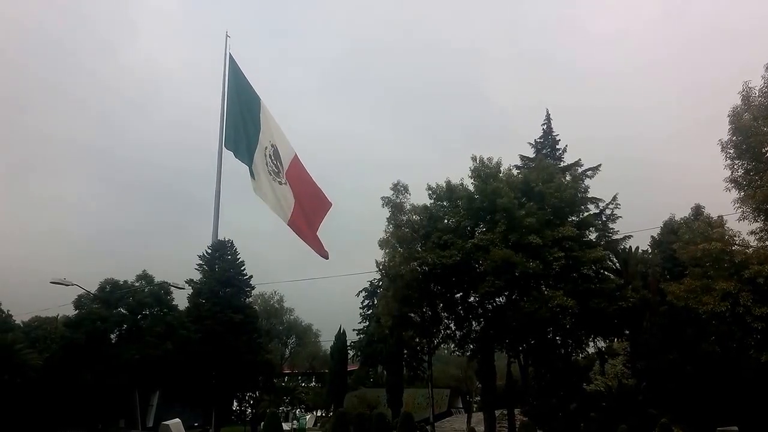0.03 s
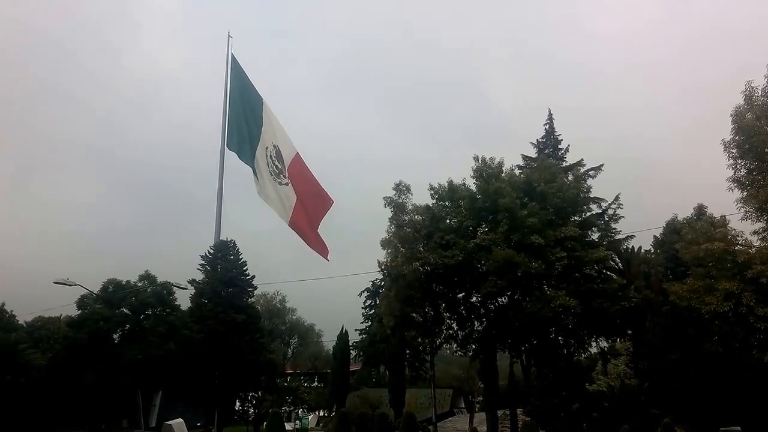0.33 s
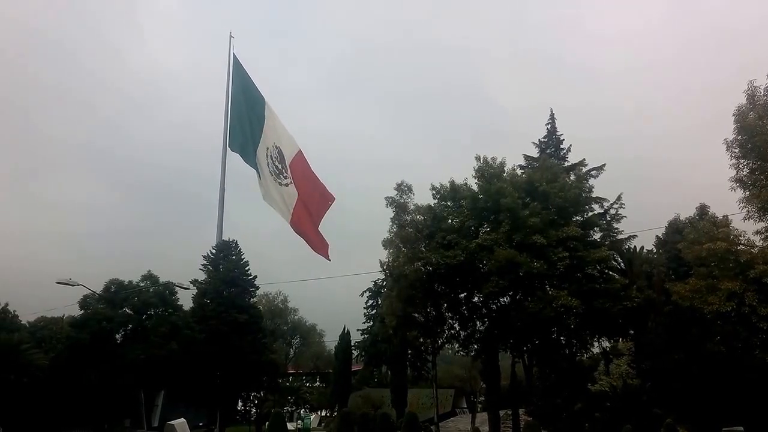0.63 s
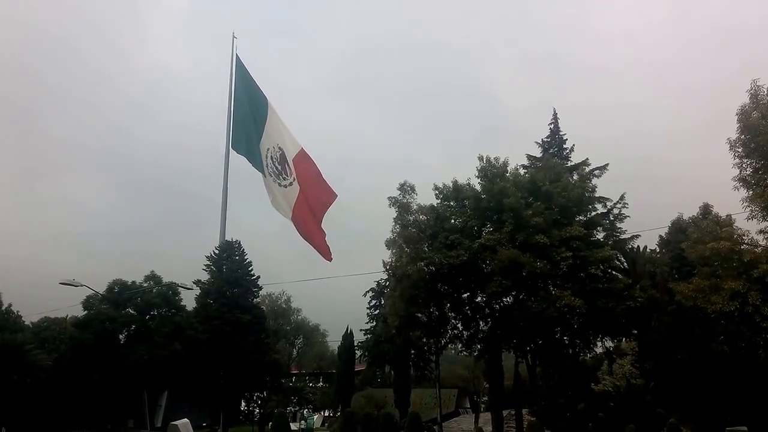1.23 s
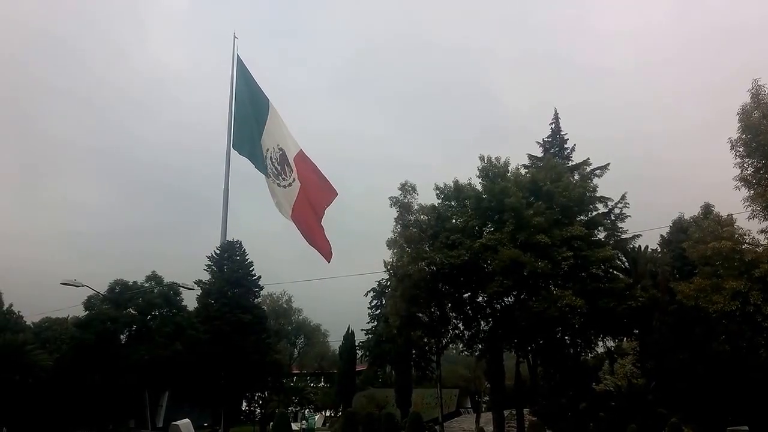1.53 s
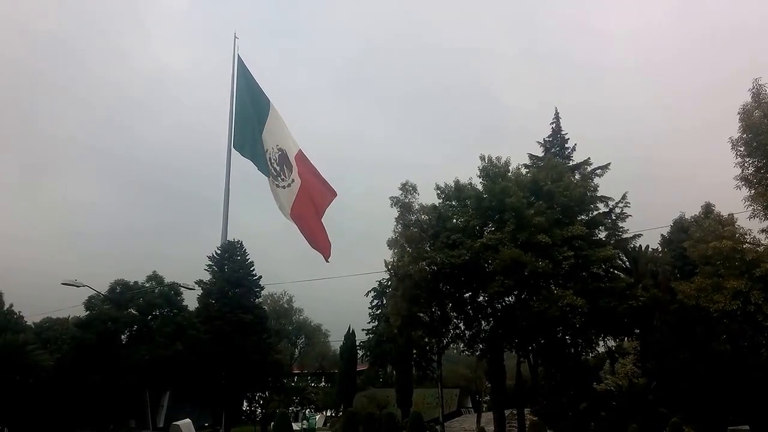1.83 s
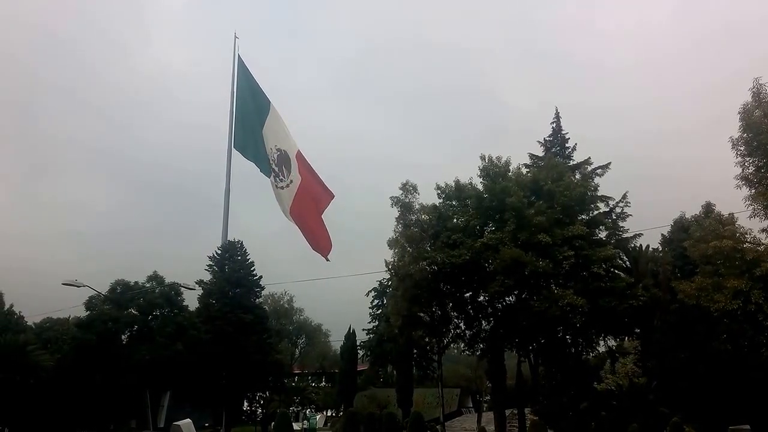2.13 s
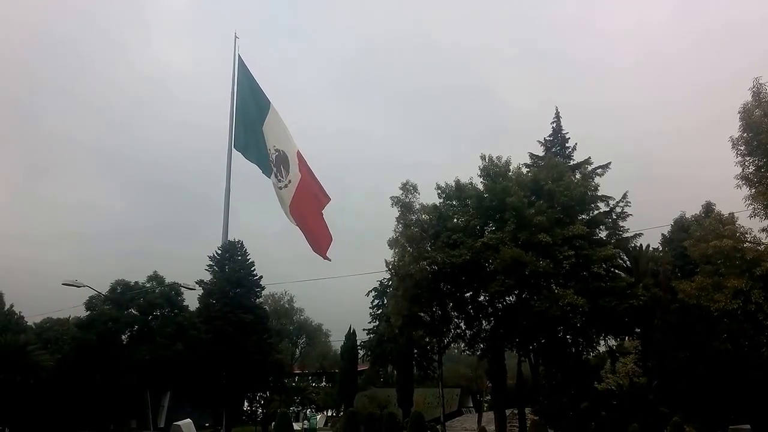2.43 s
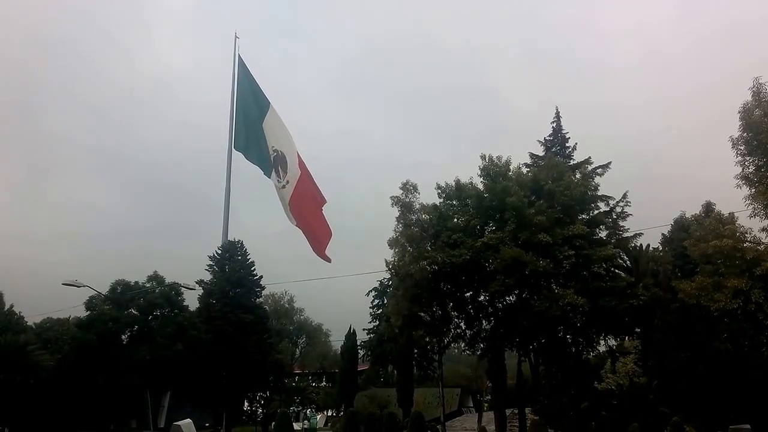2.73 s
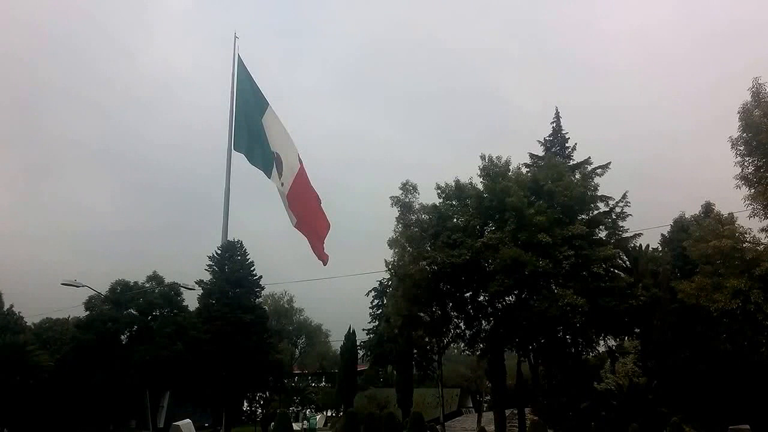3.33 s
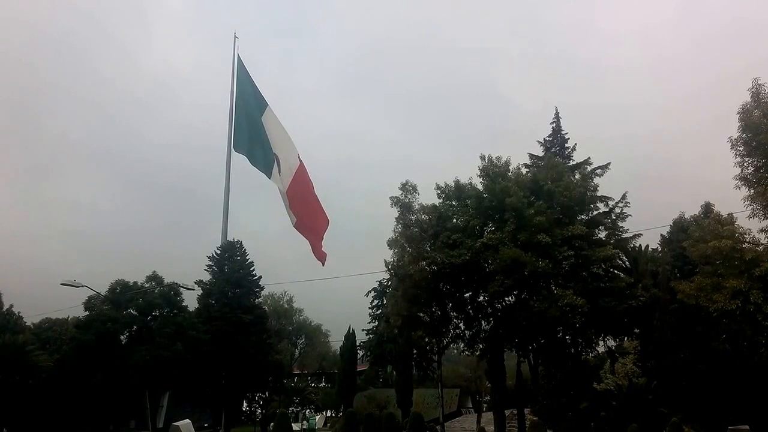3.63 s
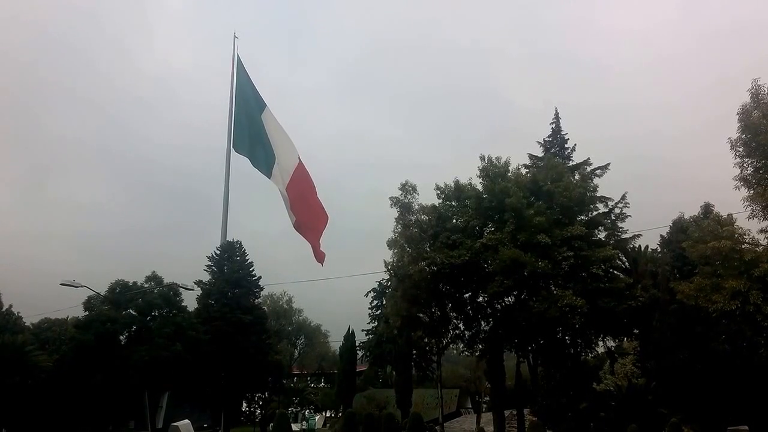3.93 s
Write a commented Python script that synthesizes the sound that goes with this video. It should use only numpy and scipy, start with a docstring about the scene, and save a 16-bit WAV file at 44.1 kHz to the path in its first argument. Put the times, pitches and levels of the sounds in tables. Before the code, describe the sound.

Distant traffic rumbles throughout, easing and swelling as truck and bus engines drone far away. Around a stereo microphone in a city park, air and foliage hiss softly and small birds chirp faintly now and then.

```python
"""Distant traffic, heard from a city park under an open sky through a stereo microphone.
The far vehicles merge into a rumble that eases and swells again; three engines drone out of it,
smeared by the streets. Around the microphone, air and foliage hiss evenly and wide, and small birds
chirp faintly in the trees: a few nearby, a flock farther off."""
import sys
import numpy as np
from scipy import signal
from scipy.fft import rfft, irfft
from scipy.io import wavfile
from scipy.ndimage import uniform_filter1d

SR = 44100
rng = np.random.default_rng(int(sys.argv[2]) if len(sys.argv) > 2 else 0)


def digitize_waveform(pressure):
    """Quantize a signal to 16-bit integers and store it at the path in sys.argv[1].

    Rows of a 2-D input are taken as channels; values are limited to [-1, 1].
    """
    field = np.atleast_2d(pressure).T
    bounded = np.clip(field, -1, 1)
    quanta = np.round(bounded * 32767).astype(np.int16)
    wavfile.write(sys.argv[1], SR, quanta)


N = 176400


def undb(db):
    return 10 ** (np.asarray(db) / 20)


def unit_rms(x):
    return x / np.sqrt(np.mean(x ** 2))


def stereo(mid, side):
    return np.array([mid + side, mid - side])


def curve(rows, column):
    """One column of a time table, sample by sample."""
    rows = np.array(rows)
    return np.interp(np.arange(N) / SR, rows[:, 0], rows[:, column])


def wander(rate_hz):
    """Random steps, smoothed twice, with an RMS of 1."""
    hold = max(int(SR / rate_hz), 2)
    steps = np.repeat(rng.standard_normal(N // hold + 1), hold)
    return unit_rms(uniform_filter1d(uniform_filter1d(steps, hold), hold)[:N])


def noise(spectrum):
    """Noise of a given colour, falling steeply beyond its ends, with an RMS of 1."""
    hz, db = np.array(spectrum).T
    f = np.maximum(np.arange(N // 2 + 1) * SR / N, 1)
    skirts = np.minimum(f / hz[0], 1) ** 4 * np.minimum(hz[-1] / f, 1) ** 4
    colour = undb(np.interp(np.log(f), np.log(hz), db))
    return unit_rms(irfft(rfft(rng.standard_normal(N)) * skirts * colour, N))


def echoes(x, t60_s):
    """Dense scattered reflections that die away."""
    t = np.arange(SR) / SR
    tail = rng.standard_normal(SR) * np.exp(-np.log(1000) * t / t60_s)
    return signal.fftconvolve(x, tail / np.linalg.norm(tail))[:N]


# Colour of the hiss around the microphone, mid and side: frequency_hz, relative_db
AIR_MID = [(410, -29), (700, -6), (885, -5), (1070, -3), (1180, -4.5), (1380, -8), (1800, -4.5), (2100, -7),
           (2280, -4.5), (2500, -7), (2970, -6), (3300, -3), (3910, -7.5), (5150, -7.5), (6240, -12.5),
           (7130, -18), (7970, -28), (10400, -58.5), (17500, -120)]
AIR_SIDE = [(290, -34), (500, -1), (638, -17), (708, -2.5), (882, -2.5), (1130, -4), (1750, -4),
            (2390, -4.5), (3300, -5.5), (4360, 2.5), (6860, -2.5), (7610, -3), (7970, -17.5), (10400, -46),
            (17500, -120)]

def air(mid_db=-45.5, side_db=-48, roar_share=0.25):
    """Far tyres and foliage hiss smoothly on all sides, following a little of the traffic's roar."""
    swell = undb(roar_share * curve(TRAFFIC_FLOW, column=2) + 0.24 * wander(8.3))
    return swell * stereo(undb(mid_db) * noise(AIR_MID), undb(side_db) * noise(AIR_SIDE))


def tree_scatter(song, wet_db=-1.5):
    """The trees scatter birdsong, sending each channel its own reflections."""
    return undb(wet_db) * np.array([echoes(song, t60_s=0.62) for _ in range(2)])


def chirps(calls, flutter_db=2.5):
    """Each bird call is a short gliding whistle whose pitch rasps and whose strength flutters."""
    t, song = np.arange(N) / SR, np.zeros(N)
    waver = wander(900)
    for start_s, length_s, first_hz, last_hz, level_db, rasp in calls:
        on = (t > start_s) & (t < start_s + length_s)
        progress = (t[on] - start_s) / length_s
        pitch_hz = (first_hz + (last_hz - first_hz) * progress) * (1 + rasp * waver[on])
        arch = 2 * np.sqrt(progress * (1 - progress))
        song[on] += undb(level_db) * arch * np.sin(2 * np.pi * np.cumsum(pitch_hz) / SR)
    return song * undb(flutter_db * wander(170))


def far_flock(count, length_s=0.025, centre_hz=3550, spread_hz=220, fall_hz=150, level_db=-59, rasp=0.025):
    """Birds farther off twitter at random, half lost in the foliage."""
    when, pitch = rng.random((count, 2)).T
    starts_s = when * N / SR
    pitches_hz = centre_hz + spread_hz * (2 * pitch - 1)
    song = chirps([(start_s, length_s, hz, hz - fall_hz, level_db, rasp)
                   for start_s, hz in zip(starts_s, pitches_hz)])
    return song + tree_scatter(song)


# Calls from the nearby trees: start_s, length_s, first_pitch_hz, last_pitch_hz, level_db, rasp_ratio
BIRD_CALLS = [(.172, 0.072, 3660, 3720, -49.5, .03), (.303, 0.021, 3900, 3600, -47, .02),
              (.43, .19, 3780, 3730, -52.5, .04), (.612, .03, 3480, 3650, -48.5, 0.026),
              (.651, 0.019, 3680, 3920, -46.5, .02), (.676, .044, 3720, 3630, -44.5, .02),
              (.832, 0.022, 3770, 3560, -45.5, .025), (.85, .05, 3620, 3680, -51, 0.023),
              (1.818, 0.071, 3570, 3610, -49.5, .018), (1.887, 0.058, 3595, 3700, -45.5, 0.026),
              (1.941, .03, 3768, 3640, -41.5, 0.022), (1.858, .11, 6850, 6830, -51, 0.038),
              (1.88, .09, 7100, 7100, -60, 0.017), (2.13, .15, 7240, 7050, -58, .012)]

def near_birds(lag_s=0.00006):
    """Birds a little to the left: their calls reach the right microphone port slightly later."""
    t, left = np.arange(N) / SR, chirps(BIRD_CALLS)
    right = np.interp(t - lag_s, t, left)
    return np.array([left, right]) + tree_scatter(left)


def engine(track, harmonics, flutter_db, waver_ratio=0.022, street_db=-8):
    """Low harmonics of an uneven firing rate, arriving directly and off the house fronts."""
    firing_hz = curve(track, column=1) * (1 + waver_ratio * wander(14))
    phase = 2 * np.pi * np.cumsum(firing_hz) / SR
    lowest, *upper = [undb(db + flutter_db * wander(9)) * np.sin(k * phase + 2 * np.pi * rng.random())
                      for k, db in harmonics]
    upper_lift = undb(curve(track, column=3))  # brighter under load
    tone = (lowest + sum(upper) * upper_lift) / np.std(lowest + sum(upper))
    direct = tone * undb(curve(track, column=2))
    reflected = np.std(direct) * unit_rms(echoes(direct, t60_s=0.8))
    return direct + undb(street_db) * reflected


# Engines in the streets beyond the park: time_s, firing_hz, level_db, upper_lift_db
TRUCK_TRACK = [(0, 70.5, -25, -3), (.28, 71, -28, -1), (.5, 71.3, -21, -4), (.68, 72, -26, -1),
               (1.03, 71, -26, -1), (1.25, 70, -34, 0), (2.3, 68.5, -31, 0), (2.75, 68, -27, 0),
               (3.05, 67.5, -31, 0), (3.4, 67, -26, -2), (3.65, 67.5, -27, 0), (3.92, 68, -21, -5),
               (4, 68, -22, -5)]
DIESEL_TRACK = [(0, 50.8, -26.5, -9.5), (.4, 51.13, -37, 1), (.6, 51.21, -35, 10.5),
                (.78, 51.53, -39.5, 3.5), (1.1, 50.95, -33, -3), (1.45, 50.87, -36, -3.5),
                (1.9, 51.21, -32.5, -3.5), (2.55, 51.6, -38, 7), (3.1, 51.24, -39, 3), (4, 51.06, -40, 3)]
BUS_TRACK = [(0, 116.9, -27, -10.5), (.5, 116, -35, -6), (1.3, 112.1, -33.5, -11), (1.6, 107.8, -46.5, 2),
             (2.3, 99.6, -40, -1.5), (2.5, 101.2, -24.5, 1), (2.68, 103.4, -23.5, -5.5),
             (2.78, 109.1, -22, -8), (2.92, 110.6, -14, -7), (3.03, 112.3, -30, 9),
             (3.2, 113.6, -29.5, 7.5), (3.4, 113.4, -29, 7.5), (3.64, 111.5, -24.5, -6),
             (3.76, 112, -37.5, 0.5), (4, 112.3, -41.5, -4)]
# Their harmonics: firing_multiple, relative_db
TRUCK_HARMONICS = [(1, 1), (2, -20.5), (3, -21)]
DIESEL_HARMONICS = [(3, 2), (4, -4.5), (6, -13)]
BUS_HARMONICS = [(1, -0.5), (2, -15), (3, -30)]

def street_engines():
    """Far off and centred, a truck runs steadily, a diesel turns at low revs and a bus pulls away."""
    truck = engine(TRUCK_TRACK, TRUCK_HARMONICS, flutter_db=2.0)
    diesel = engine(DIESEL_TRACK, DIESEL_HARMONICS, flutter_db=2.5)
    bus = engine(BUS_TRACK, BUS_HARMONICS, flutter_db=2.5)
    return truck + diesel + bus


# Colour of the traffic as it reaches the park, mid and side: frequency_hz, relative_db
TRAFFIC_MID = [(24, -34), (40, -19), (52, -9.5), (62, -1.5), (75, -0.5), (90, 3), (112, -4.5), (135, -7),
               (182, -8), (215, -16.5), (250, -17), (310, -20.5), (400, -26.5), (445, -26.5), (520, -33),
               (650, -34.5), (1000, -47.5)]
TRAFFIC_SIDE = [(24, -40.5), (40, -13), (62, 0), (102, -3.5), (216, -5.5), (275, -10), (600, -19),
                (780, -51), (1320, -120)]
# Ebb and swell on the far roads: time_s, rumble_gain_db, roar_gain_db
TRAFFIC_FLOW = [(0, 2, -1), (.6, -3, 1), (1.1, 1.5, -0.5), (1.55, -2, -3.1), (2.15, -2.5, -2.6),
                (2.5, 2.5, -0.5), (2.85, -2.5, 1), (3.15, -1, 1.1), (3.6, 2.5, 0.5), (4, -5.5, -0.9)]

def traffic(mid_db=-22, side_db=-50.5, crossover_hz=137, lumps_db=1.5):
    """Many far vehicles merge into a lumpy, deep rumble and a higher roar, each swelling with the flow."""
    vehicles = noise(TRAFFIC_MID)
    lows = signal.sosfiltfilt(signal.butter(2, crossover_hz, fs=SR, output="sos"), vehicles)
    roar = (vehicles - lows) * undb(curve(TRAFFIC_FLOW, column=2) + 1.3 * wander(7.03))
    rumble = lows * undb(curve(TRAFFIC_FLOW, column=1) + lumps_db * wander(18))
    return stereo(undb(mid_db) * (rumble + roar), undb(side_db) * noise(TRAFFIC_SIDE))


def scene():
    """From a spot in the park: engines and traffic far off, air and birds all around."""
    return street_engines() + traffic() + air() + near_birds() + far_flock(count=36)


# Balance of the two microphone ports: frequency_hz, left_minus_right_db
MIC_BALANCE = [(60, 0.5), (100, 0.5), (180, 1.5), (300, -0.5), (510, 0.5), (880, 0.0), (1500, -2.5),
               (2570, 0.5), (4400, 2), (7520, -1.5)]

def record(dry, top_hz=8000):
    """The two microphone ports differ slightly in colour; the recorder cuts the top."""
    hz, db = np.array(MIC_BALANCE).T
    f = np.maximum(np.arange(N // 2 + 1) * SR / N, 1)
    lean_db = np.interp(np.log(f), np.log(hz), db) / 2
    ports = irfft(rfft(dry) * undb([lean_db, -lean_db]), N)
    return signal.sosfilt(signal.ellip(10, 0.2, 80, top_hz, fs=SR, output="sos"), ports)


dry = scene()
out = record(dry)
digitize_waveform(out)
```